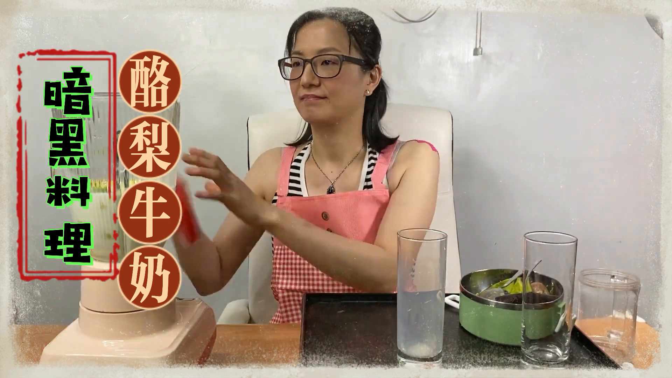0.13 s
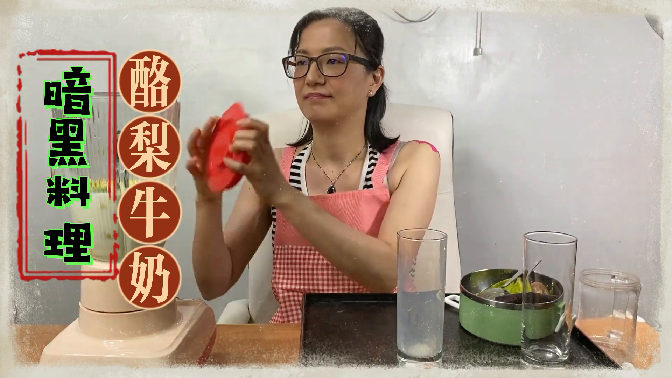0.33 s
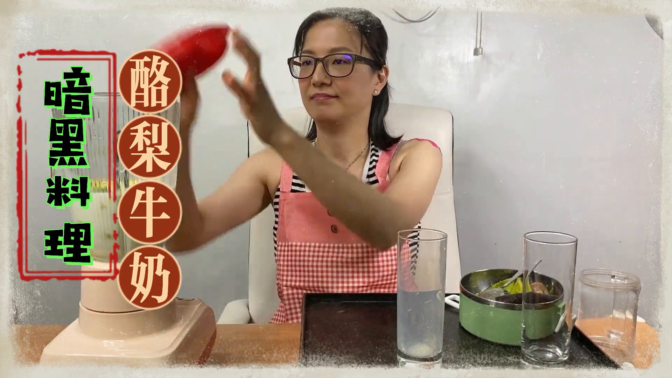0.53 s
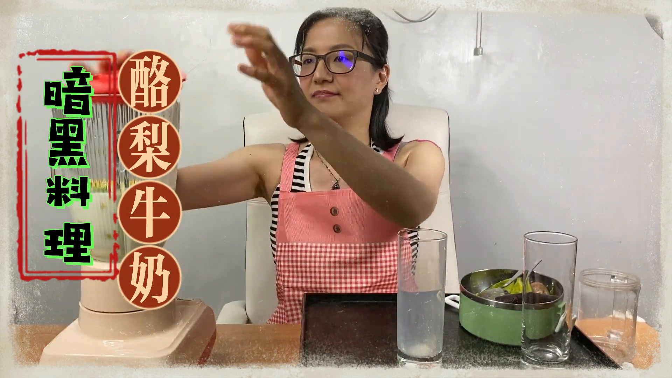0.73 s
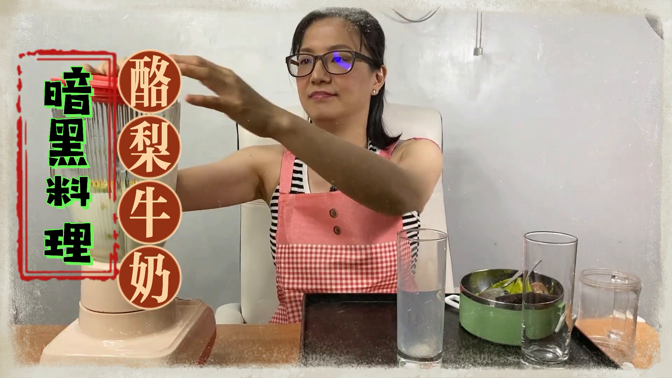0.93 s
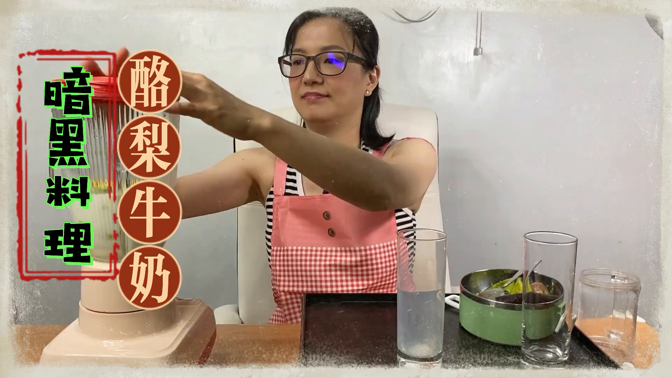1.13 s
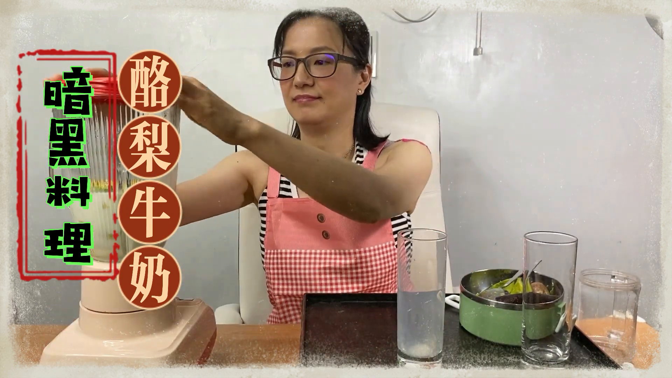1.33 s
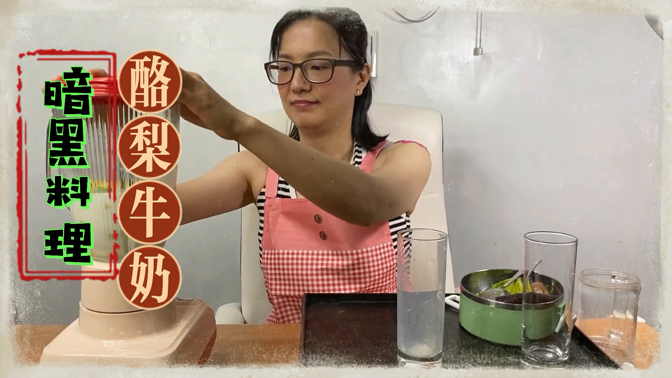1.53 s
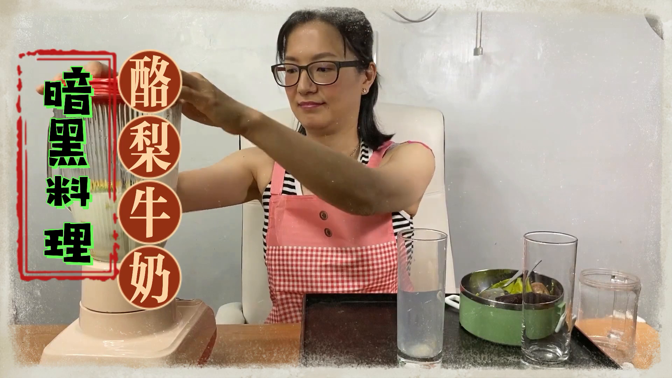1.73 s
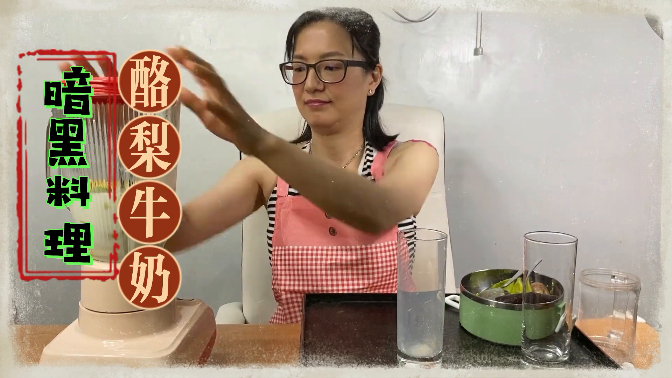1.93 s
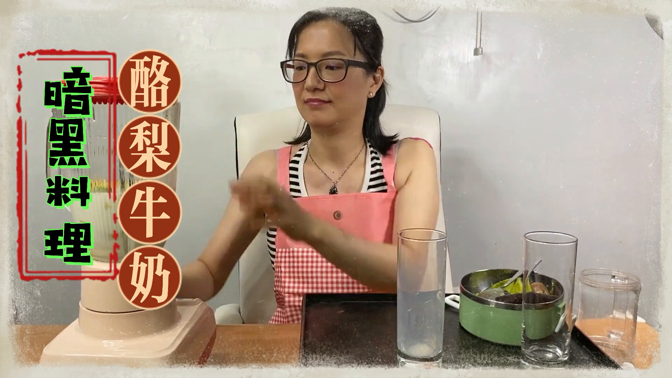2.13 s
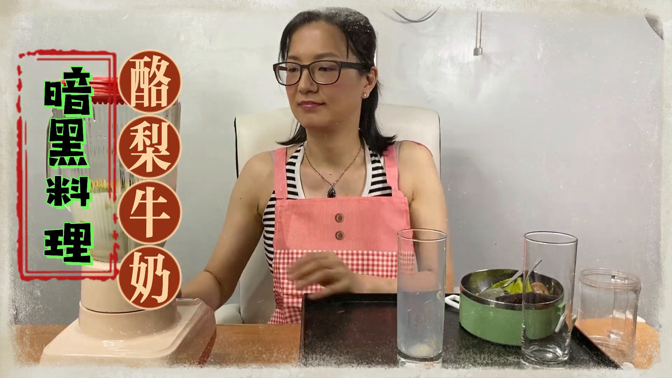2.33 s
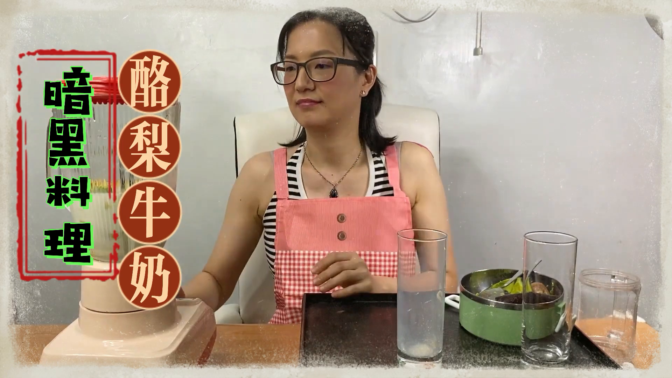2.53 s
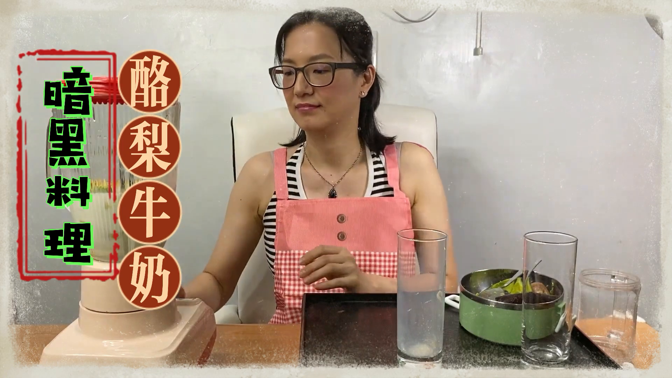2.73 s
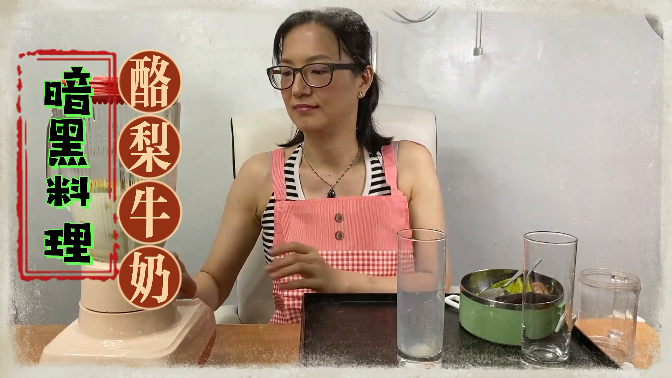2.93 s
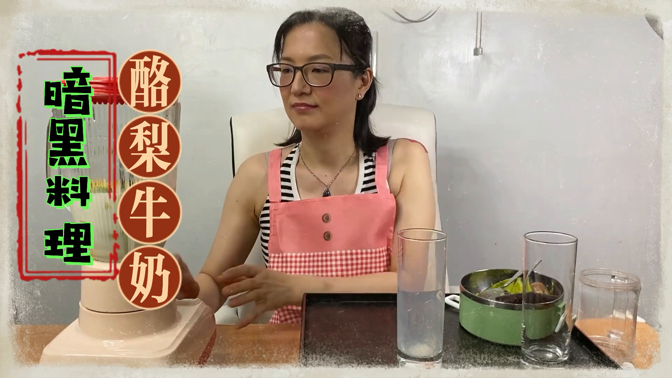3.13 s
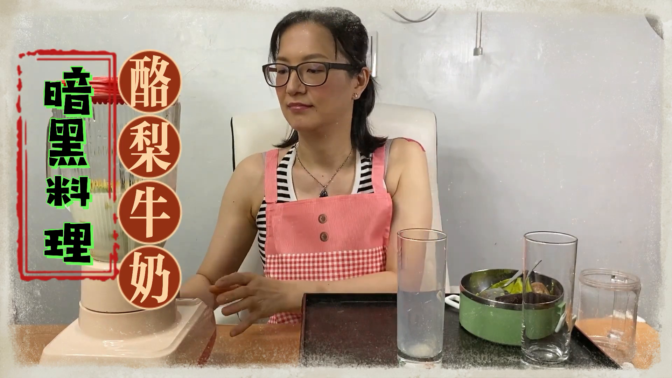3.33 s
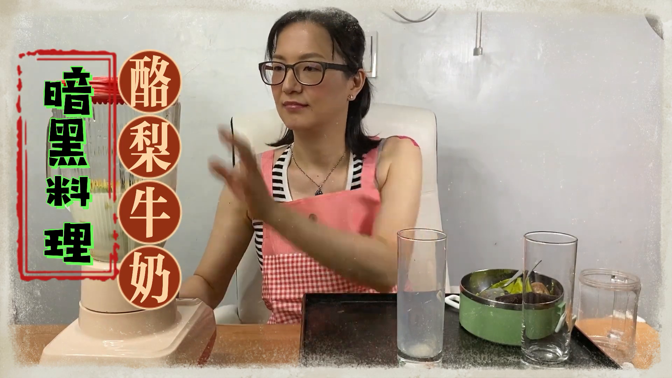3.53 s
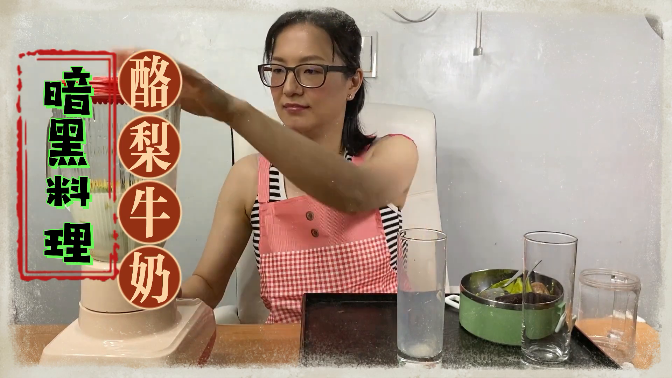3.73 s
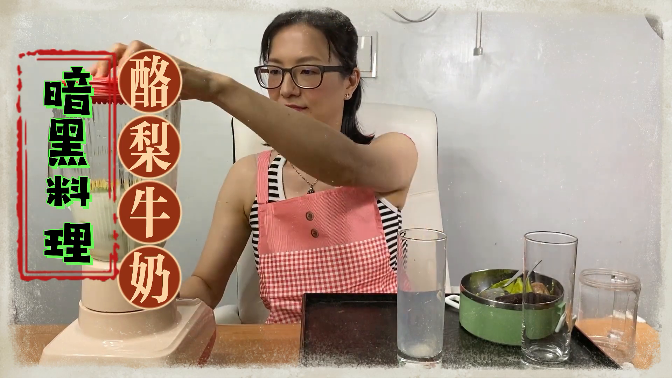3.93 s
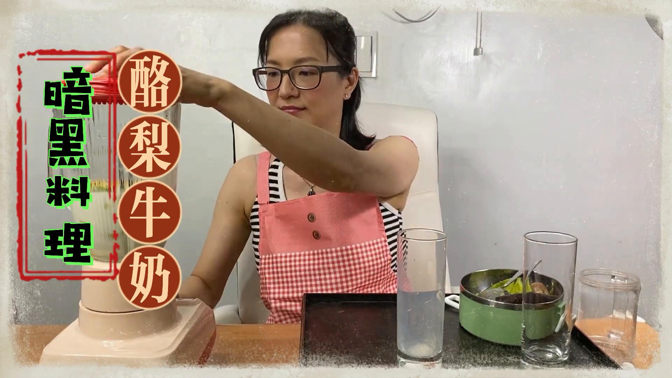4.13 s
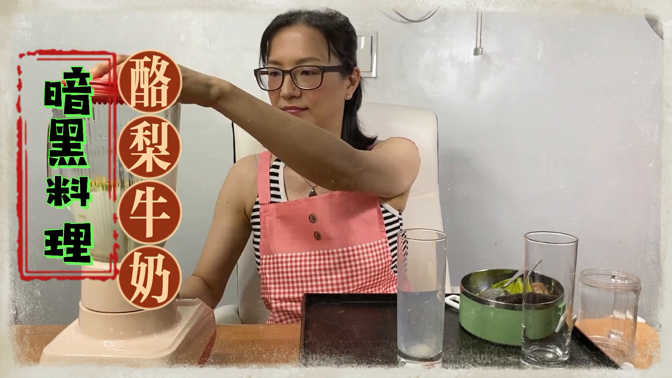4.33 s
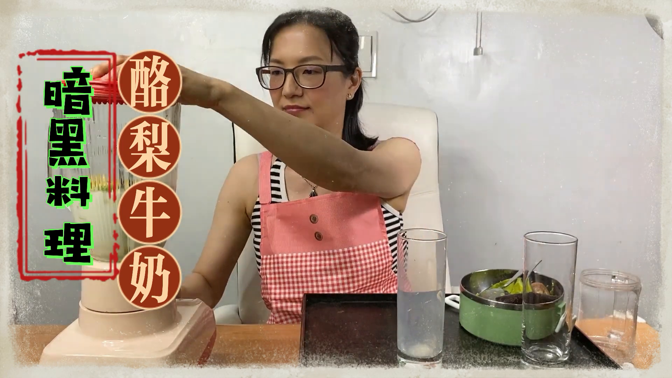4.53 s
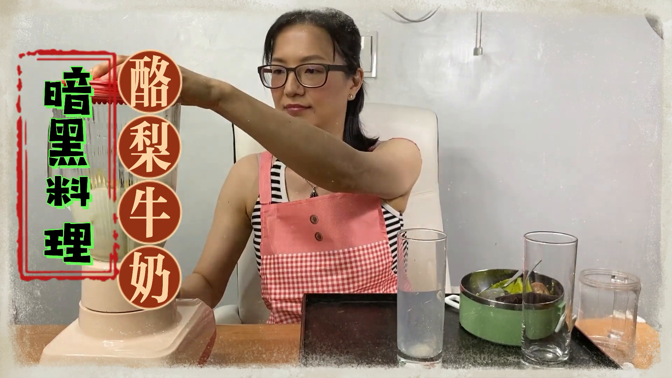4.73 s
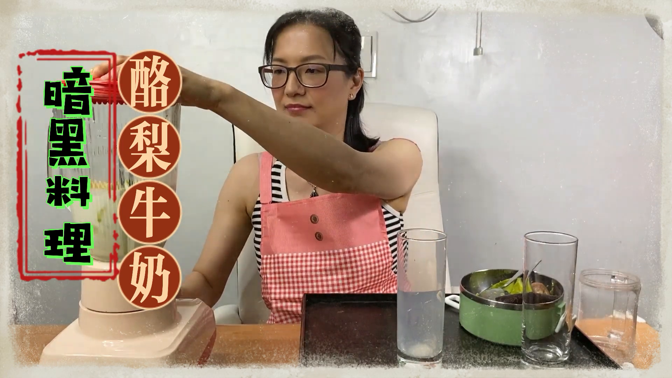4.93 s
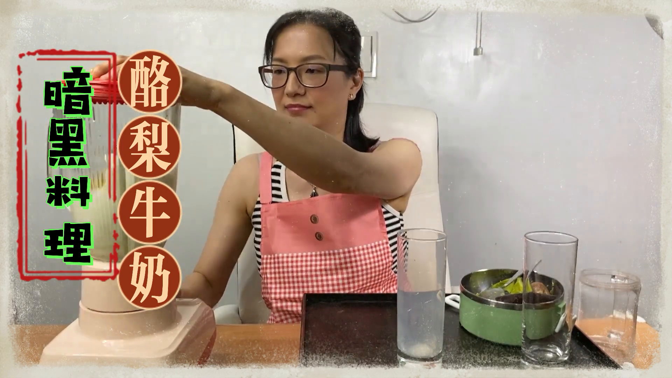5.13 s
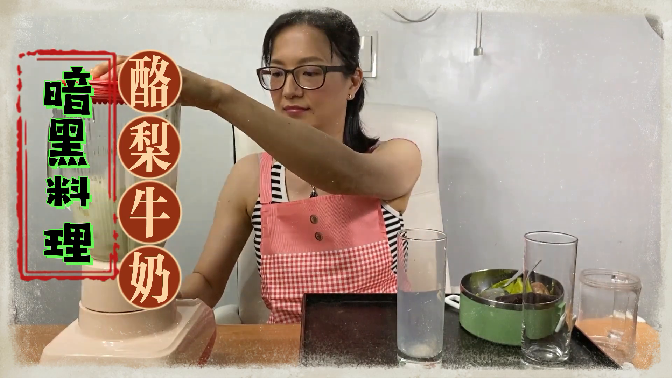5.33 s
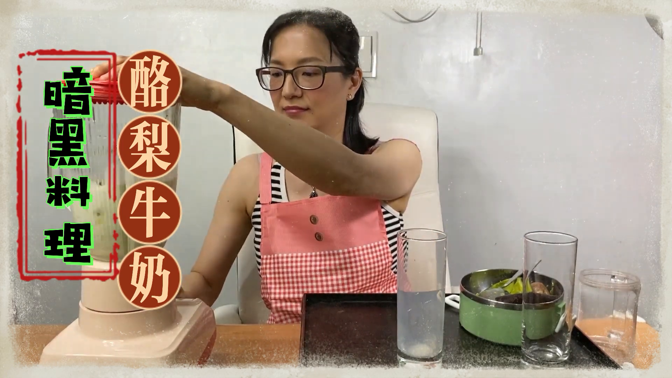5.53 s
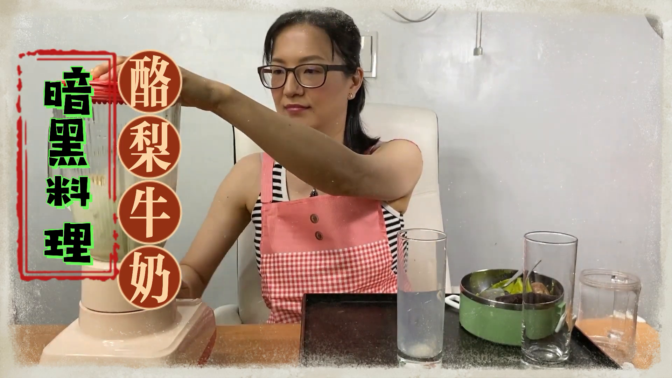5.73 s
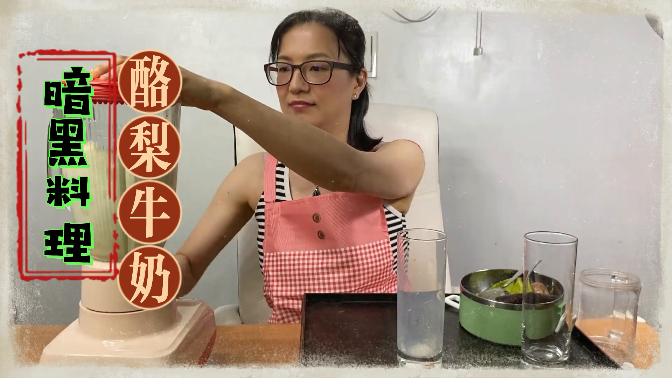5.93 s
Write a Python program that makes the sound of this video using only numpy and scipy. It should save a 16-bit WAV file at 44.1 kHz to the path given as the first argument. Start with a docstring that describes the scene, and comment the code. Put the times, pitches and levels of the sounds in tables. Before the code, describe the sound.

Close, mono sound of a blender being readied and pulsed indoors. Light plastic knocks come first, then a firm lid hit and small dull thumps and scuffs that taper away. Switch clicks begin sparsely, a strong palm thump lands, and clacks become rapid. Short wet growls, bubbling gulps and brief chirps follow, each coasting down, before a final full-speed whine and hissing splash. Low appliance hum and a short hard-room tail lie underneath.

```python
"""Blender pulsed in a kitchen

A countertop blender full of milk and fruit stands on a table in a small, hard-walled kitchen.
Its plastic lid is pushed on and worked tight: bursts of noise ring the jar, skin squeaks, air thumps.
The pulse switch is jabbed again and again: clacks and snaps ring the motor housing.
The motor twitches, churns the liquid in short bursts and at last whines up to full speed; its shaft
speed drives the whine, the shaking and the filtered noise of the liquid."""
import sys
import numpy as np
from scipy import signal
from scipy.fft import rfft, irfft
from scipy.io import wavfile
from scipy.ndimage import uniform_filter1d

SR = 44100
rng = np.random.default_rng(int(sys.argv[2]) if len(sys.argv) > 2 else 0)


def wav_out(sig):
    """Save sig, one row per channel (or a flat mono array), as 16-bit PCM at SR to the path in sys.argv[1]."""
    wavfile.write(sys.argv[1], SR, np.round(np.clip(np.atleast_2d(sig).T, -1, 1) * 32767).astype(np.int16))


N = 264600
T = np.arange(N) / SR  # time in seconds


def undb(db):
    """Turn decibels into gain."""
    return 10 ** (np.asarray(db) / 20)


def unit(x):
    """Scale to an rms of 1."""
    return x / np.sqrt(np.mean(x ** 2) + 1e-20)


def add(out, start_s, x):
    """Mix x into out from a given time."""
    i = max(int(start_s * SR), 0)
    out[i:i + len(x)] += x[:N - i]


def walk(rate_hz):
    """Random motion with a spread near 1: straight lines between random points."""
    steps = np.arange(0, 7, 1 / rate_hz)
    return 1.2 * np.interp(T, steps, rng.standard_normal(len(steps)))


def colour(x, points, size=2048):
    """Filter through (Hz, dB) points without any sound ahead of the input (minimum phase)."""
    hz, db = np.transpose(points)
    f = np.maximum(np.arange(size // 2 + 1) * SR / size, 1)
    curve_db = np.interp(np.log(f), np.log(hz), db)
    # Folding the cepstrum gathers the filter's response at its start
    cepstrum = irfft(np.log(undb(curve_db)))
    cepstrum[1:size // 2] *= 2
    cepstrum[size // 2 + 1:] = 0
    response = irfft(np.exp(rfft(cepstrum)))
    return signal.fftconvolve(x, response)[:len(x)]


def band(x, lo_hz, hi_hz, order=3):
    """Keep only the sound between two frequencies."""
    edges = [lo_hz, min(hi_hz, .45 * SR)]
    return signal.sosfilt(signal.butter(order, edges, "band", fs=SR, output="sos"), x)


def resonate(x, modes):
    """Sum of resonances, each given by Hz, width in Hz and dB."""
    out = 0
    for hz, width_hz, db in modes:
        b, a = signal.iirpeak(hz, hz / width_hz, fs=SR)
        out = out + undb(db) * signal.lfilter(b, a, x)
    return out


def registers(x):
    """Low, middle and treble parts of a sound."""
    return [band(x, 100, 700), band(x, 700, 2500), band(x, 2500, 18000)]


def contact(decay_s, evenness=0.19, size=8192):
    """Brief chatter of two plastic parts that meet; each contact favours its own frequencies."""
    fade = np.exp(-np.arange(size) / SR / max(decay_s, .001))
    chatter = rfft(rng.standard_normal(size) * fade ** 0.65)
    return irfft(chatter / np.abs(chatter) ** evenness) * fade ** 0.22


def knocks(table, spectrum, modes, attack_s, ring_db, low_db, middle_db, treble_db):
    """Each contact cracks and sets the body ringing; a harder one has more treble and less bass."""
    out = np.zeros(N)
    for start_s, strength_db, hardness_db, decay_s in table:
        push = contact(decay_s)
        push = push * (1 - np.exp(-T[:len(push)] / attack_s))
        crack = unit(colour(push, spectrum))
        ring = unit(resonate(push, modes))
        hit = crack + undb(ring_db) * ring
        trims_db = (low_db - hardness_db, middle_db, treble_db + hardness_db)
        for part, trim_db in zip(registers(hit), trims_db):
            loudest = np.sqrt(uniform_filter1d(part ** 2, size=441).max())  # over 10 ms
            add(out, start_s, undb(strength_db + trim_db) * part / loudest)
    return out


def pocket(hz, cycles, glide, rise):
    """A tone, such as a pocket of air, swells, rings for some cycles and shifts in pitch."""
    age = np.arange(int(6 * cycles / hz * SR)) * hz / SR  # in cycles, as is rise
    envelope = (1 - np.exp(-(age / rise) ** 2)) * np.exp(-age / cycles)
    tone = np.sin(2 * np.pi * age * (1 + glide * age / age[-1]))
    return envelope / envelope.max() * tone


def pockets(table, cycles, glide, rise):
    """Play rows of start in seconds, dB and starting Hz as ringing tones."""
    out = np.zeros(N)
    for start_s, db, hz in table:
        add(out, start_s, undb(db) * pocket(hz, cycles, glide, rise))
    return out


# Tone of the steady air noise. Each row: frequency in Hz, relative level in dB.
AIR_COLOUR = [(12, -43.5), (20, -1.5), (32, -5.5), (43, -8), (65, -3.5), (86, -19.5), (120, -17),
              (301, -22), (377, -21.5), (590, -25), (718, -22), (1290, -25), (1860, -23), (14700, -53.5),
              (16000, -49)]


def room_tone():
    """Steady air noise and the low, slightly wavering hum of an appliance."""
    air = colour(rng.standard_normal(N), AIR_COLOUR, size=8192)
    air *= undb(-62.5) / np.std(band(air, 91, 16000))
    hum = np.sin(2 * np.pi * np.cumsum(58.6 + 0.53 * walk(12)) / SR)
    return air + undb(-62.0 + 0.68 * walk(6)) * hum


# Lid and jar knocked or scuffed. Each row: start in seconds, strength in dB before the trims below,
# hardness in dB, decay setting of the contact in seconds.
LID_KNOCKS = [(0.028, -33, 5, 0.0052), (0.044, -37.5, 1.5, 0.012), (0.32, -43, 2, .008),
              (0.362, -46.5, 4, 0.0098), (0.38, -49.5, 8, 0.0053), (0.802, -23.5, -5, 0.0057),
              (0.81, -27.5, 5.5, 0.0089), (0.898, -38, -8.5, 0.016), (0.975, -37, 4, 0.0049),
              (0.991, -40, -8, 0.02), (1.018, -38, 7, 0.0085), (1.116, -40, -1.5, 0.0074),
              (1.167, -38, 0, 0.0057), (1.239, -42, 5.5, 0.006), (1.258, -51, -5, .006),
              (1.352, -53.5, -11.5, 0.01), (1.5, -51.5, -7, .007), (1.548, -43.5, -2.5, 0.0067),
              (1.607, -43, -8.5, 0.0052), (1.715, -48, -8, 0.0098), (1.768, -42, 1.5, 0.0065),
              (1.789, -40.5, 3.5, 0.0039), (1.855, -43.5, -4, 0.011), (1.961, -52.5, 6.5, .009),
              (2.255, -52, -12, 0.0053), (2.309, -46.5, -2.5, .009), (3.875, -30, 2.5, .006),
              (3.891, -28.5, 0.5, 0.0046), (3.999, -38, -2, .005)]
# Tone of the crack. Each row: frequency in Hz, relative level in dB.
LID_COLOUR = [(88, -48.5), (150, -9), (248, -6.5), (339, -11), (561, -5), (695, -13), (1420, -11),
              (2500, -20.5), (4140, -19), (6860, -32.5), (15500, -54)]
# Ringing of the jar with its lid. Each row: frequency in Hz, relative level in dB,
# time to fade by 60 dB in seconds.
JAR = [(261, 15, 0.6), (597, 16, 0.078), (1254, 14, 0.076), (1380, 10, 0.66), (1730, 6, 0.051),
       (1970, 1, 0.2), (2180, -15, 0.079), (2940, -39, 0.43), (3520, 1, 0.48), (3830, -15, 0.43),
       (4730, 4, 0.49), (4900, -45, 0.19)]


def lid():
    """Plastic knocks and scuffs crack and ring the jar; long rings are narrow resonances."""
    modes = [(hz, np.log(1000) / np.pi / t60_s, db) for hz, db, t60_s in JAR]
    return knocks(LID_KNOCKS, LID_COLOUR, modes, attack_s=0.000093, ring_db=-18.0,
                  low_db=-13.5, middle_db=-7.5, treble_db=-17.0)


# Fingers squeaking on the lid. Each row: middle in seconds, average level in dB, average pitch in Hz.
SQUEAKS = [(0.376, -56, 3850), (0.565, -62, 3650)]


def squeaks(length_s, spread):
    """Skin sticks and slips on plastic: a short, unsteady, narrow chirp."""
    out = np.zeros(N)
    for middle_s, db, hz in SQUEAKS:
        slips = np.sin(2 * np.pi * np.cumsum(hz * (1 + spread * walk(980))) / SR)
        swell = np.exp(-((T - middle_s) / length_s) ** 2)
        out += undb(db + 2 * walk(198.6)) * swell * slips
    return out


# Palm on the lid. Each row: start in seconds, peak level in dB, starting pitch in Hz.
THUMPS = [(0.806, -34, 267), (0.985, -35, 375), (1.018, -37.5, 219), (1.125, -46, 230), (1.165, -41.5, 198),
          (1.238, -35, 223), (1.352, -38, 200), (3.879, -20.5, 239)]


def thumps():
    """The palm bounces the air in the jar: a dull, quickly fading tone that sinks slightly."""
    return pockets(THUMPS, cycles=1.37, glide=-0.03, rise=0.65)


# Switch pushed in. Each row: start in seconds, strength in dB before the trims below,
# hardness in dB, time until it bottoms out in seconds.
PUSHES = [(2.662, -45, -12, 0.0064), (2.842, -31, -0.5, 0.025), (3.683, -38.5, -4.5, .008),
          (4.048, -29, 0, .013), (4.137, -42, -2, 0.0065), (4.161, -37.5, -1, 0.0061),
          (4.23, -32, -0.5, .008), (4.268, -31.5, -5, .012), (4.422, -28, -0.5, 0.011),
          (4.558, -29.5, 1, 0.013), (4.76, -31, 3.5, 0.018), (4.84, -39.5, -7, .006),
          (4.904, -25.5, 1.5, .014), (5.103, -29.5, 1, .014), (5.273, -31.5, 4.5, .01)]
# Switch springing back. Each row: start in seconds, strength in dB before the trims below, hardness in dB.
SNAPS = [(2.713, -48, -1), (2.916, -25.5, -0.5), (3.214, -35.5, 2.5), (3.754, -29.5, -0.5),
         (3.949, -27, -2.5), (4.147, -32, 1), (4.316, -27, 3.5), (4.502, -28.5, -0.5), (4.657, -25, 1.5),
         (4.851, -28.5, 2), (5.033, -31.5, 3.5), (5.212, -28, 1.5), (5.375, -32, 4), (5.72, -37.5, 4.5),
         (5.791, -26.5, 1.5)]
# Tone of the push. Each row: frequency in Hz, relative level in dB.
PUSH_COLOUR = [(88, -68), (150, -4), (376, -31.5), (524, 4), (790, -14), (1390, -1), (1870, -9.5),
               (2550, -3), (5460, -14), (6390, -18.5), (8560, -11.5), (14000, -39), (16000, -36)]
# Tone of the snap. Each row: frequency in Hz, relative level in dB.
SNAP_COLOUR = [(120, -32), (200, -19), (506, 0), (702, -16.5), (1130, -18), (1380, -3), (2090, -3.5),
               (2700, 3), (3070, -6), (3610, -2), (15500, -49.5)]
# Resonances of the motor housing, which carries the switch; the blending noise rings it too.
# Each row: frequency in Hz, width in Hz, relative level in dB.
HOUSING = [(234, 46, 0), (367, 17, 9), (532.8, 8.7, 14), (990, 70, -10.5), (1156, 210, 2.5),
           (1366, 105, 9.5), (1625, 71, 5.5), (2080, 170, -2.5), (2550, 110, -8), (2730, 110, 1),
           (3426, 360, 6.5), (3920, 120, -2), (4020, 64, 2), (6150, 170, -2.5), (8180, 110, -8.5)]


def switch(bottom_db=-2.0, push_decay_s=0.0092, snap_decay_s=0.0043):
    """The sprung switch clacks in, bottoms out and snaps back, ringing the motor housing."""
    pushes = []
    for start_s, db, hardness_db, lag_s in PUSHES:
        pushes.append((start_s, db, hardness_db, push_decay_s))
        pushes.append((start_s + lag_s, db + bottom_db, hardness_db, push_decay_s))
    snaps = [(start_s, db, hardness_db, snap_decay_s) for start_s, db, hardness_db in SNAPS]
    clacks = knocks(pushes, PUSH_COLOUR, HOUSING, attack_s=0.00057, ring_db=-2.5,
                    low_db=-16.5, middle_db=-5, treble_db=-15)
    returns = knocks(snaps, SNAP_COLOUR, HOUSING, attack_s=0.00026, ring_db=-4.5,
                     low_db=-18.0, middle_db=-7.5, treble_db=-5.0)
    return clacks + returns


# Power reaches the motor. Each row: start in seconds, time held in seconds, coasting decay in seconds,
# then churn, rattle, spray and whine levels in dB before the trims and changes with speed below.
JABS = [(4.257, 0.033, 0.049, -27, -31.5, -41, -55), (4.564, .08, 0.087, -29, -32, -43.5, -46),
        (4.914, .07, .24, -26.5, -27.5, -42.5, -38), (5.112, .075, .14, -30, -29.5, -45, -47),
        (5.278, 0.033, 0.53, -31, -29.5, -44.5, -43), (5.471, 0.05, .28, -28, -28.5, -45.5, -30),
        (5.765, 0.31, .3, -28, -27, -42, -29.5)]
TOP_TURNS_HZ, SPIN_UP_S = 121, .05  # free speed in turns per second; time constant of the run-up


def shaft():
    """Under power the shaft runs up towards its free speed, then coasts; torque falls as speed rises."""
    speed, torque = np.zeros(N), np.zeros(N)
    for start_s, held_s, coast_s, *_ in JABS:
        i = int(start_s * SR)
        age = T[i:] - T[i]
        powered_s = np.minimum(age, held_s)
        coasting_s = np.maximum(age - held_s, 0)
        # Slip is how far the shaft lags its free speed, from 1 at rest to 0
        slip = (1 - speed[i] / TOP_TURNS_HZ) * np.exp(-powered_s / SPIN_UP_S)
        speed[i:] = TOP_TURNS_HZ * (1 - slip) * np.exp(-coasting_s / coast_s)
        torque[i:] = slip * (age < held_s)
    return speed, uniform_filter1d(torque, size=441)


def jab_levels():
    """Churn, rattle, spray and whine levels of each jab, held until the next."""
    table = np.array(JABS)
    latest = np.maximum(np.searchsorted(table[:, 0], T) - 1, 0)
    return uniform_filter1d(table[latest, 3:], size=882, axis=0).T  # 20 ms blend


# Tone of the blending noise. Each row: frequency in Hz, relative level in dB.
BLEND_COLOUR = [(40, -19.5), (115, -9.5), (229, -4.5), (300, -12), (500, -6), (680, -12), (920, -4),
                (1900, -19.5), (2550, -11), (3100, -15.5), (4400, -17), (5400, -22.5), (10000, -37),
                (15500, -59)]


def blending(turns, churn_db, rattle_db, spray_db):
    """Blades fling drops and pulp at the jar, harder twice a turn; the housing resonates, bubbles ring."""
    sweep = 1 + 0.097 * np.cos(2 * np.pi * 2 * turns)
    landings = rng.random(N) < 3000 / SR  # about 3000 a second
    extra_db = 1.3 * np.minimum(rng.exponential(size=N), 3)
    drops = landings * rng.standard_normal(N) * undb(extra_db)
    pulp = 0.5 * rng.standard_normal(N)
    impacts = (unit(drops) + pulp) * sweep * undb(0.45 * walk(120))
    wash = unit(colour(impacts, BLEND_COLOUR)) + undb(-3.5) * unit(resonate(impacts, HOUSING))
    # Random start, level spread over 12 dB and pitch from 170 to about 648 Hz
    rows = [(T[-1] * a, 12 * b, 170 * 3.81 ** c) for a, b, c in rng.random((500, 3))]
    bubbles = pockets(rows, cycles=6.6, glide=0.16, rise=0.54)
    low, middle, treble = map(unit, registers(wash))
    churn = unit(low + undb(-8.5) * unit(bubbles))
    spray = treble * undb(1.2 * walk(140))  # fine spray comes in spurts
    return undb(churn_db - 4.5) * churn + undb(rattle_db - 1.5) * middle + undb(spray_db + 2) * spray


def liquid(speed, torque, turns, churn_db, rattle_db, spray_db):
    """Blending grows louder with speed, and with torque as the blades bite into still liquid."""
    octaves = np.log2(speed / TOP_TURNS_HZ + 1e-6)  # doublings of speed, 0 at free speed
    bite_db = 5 * torque
    return blending(turns, churn_db + bite_db + 6.5 * octaves,
                    rattle_db + bite_db + 9 * octaves,
                    spray_db + bite_db + 8.5 * octaves)


# Motor frame that radiates the whine, passed through twice.
# Each row: frequency in Hz, width in Hz, level in dB for each pass.
WHINE_BODY = [(2440, 720, -1)]


def commutator_whine(turns, whine_db):
    """Commutator bars pass the brushes 24 times a turn; the motor frame rings with the whine."""
    bars = np.sin(2 * np.pi * 24 * turns)
    body = resonate(resonate(bars, WHINE_BODY), WHINE_BODY)
    pressure = 0.81 + 0.41 * np.cos(2 * np.pi * turns)  # the brushes press unevenly round the turn
    return undb(whine_db + 2 * walk(200)) * body * pressure


# Shaft unbalance. Each row: multiple of the shaft rate, average level in dB before the trim below.
UNBALANCE = [(1, -30.5), (2, -25.5), (3, -30.5), (4, -38), (6, -36), (8, -38.5), (9, -38.5), (12, -39)]


def unbalance_shake(speed, turns):
    """The uneven shaft shakes at multiples of its rate, fading steeply below 113 turns a second."""
    shake = np.zeros(N)
    for multiple, db in UNBALANCE:
        shake += undb(db + 2.7 * walk(30)) * np.sin(2 * np.pi * round(multiple) * turns)
    return shake * undb(1.2 * np.minimum(speed - 113, 0) - 1.5)


def motor_hum(speed):
    """A 60 Hz mains hum with low rumble fades in between 30 and 78 turns a second."""
    rumble = unit(band(rng.standard_normal(N), 20, 116))
    hum = np.sin(2 * np.pi * 60 * T) + 0.69 * rumble
    return undb(-45.0) * np.clip((speed - 30) / 48, 0, 1) * hum


def motor():
    """One turning shaft drives the whine, the shaking, the hum and the churned liquid."""
    speed, torque = shaft()
    churn_db, rattle_db, spray_db, whine_db = jab_levels()
    turns = np.cumsum(speed * (1 + 0.0098 * walk(300))) / SR  # lumps of fruit jolt the shaft
    return (commutator_whine(turns, whine_db) + unbalance_shake(speed, turns) + motor_hum(speed)
            + liquid(speed, torque, turns, churn_db, rattle_db, spray_db))


# Air pockets gulped by the blades. Each row: start in seconds, peak level in dB, starting pitch in Hz.
GULPS = [(4.295, -33.5, 482), (4.640, -38, 358), (4.705, -40.5, 492), (4.984, -26, 500),
         (5.008, -29.5, 350), (5.180, -25, 483), (5.190, -27.5, 226), (5.493, -37, 497), (5.664, -30, 478)]


def gulps():
    """Gulped air swells, rings and rises in pitch."""
    return pockets(GULPS, cycles=4.9, glide=0.17, rise=2.4)


# Motor housing chirping as the switch is pushed in.
# Each row: start in seconds, peak level in dB before its flutter, starting pitch in Hz.
CHIRPS = [(5.11, -25, 1298), (5.272, -26, 1243)]


def chirps():
    """The housing chirps: a swelling, fluttering tone that rises in pitch."""
    return pockets(CHIRPS, cycles=9, glide=.3, rise=14.6) * undb(2.6 * walk(400))


def splash(middle_s=5.91, length_s=0.045, level_db=-43.5):
    """Liquid climbs the jar as the blades near full speed and breaks into hissing spray."""
    hiss = unit(band(rng.standard_normal(N), 3500, 15000, order=1))
    swell = np.exp(-((T - middle_s) / length_s) ** 2)
    return undb(level_db + 2 * walk(200)) * swell * hiss


def kitchen(x, t60_low, t60_middle, t60_treble, size=22050):
    """The short tail that close, hard walls send back; each t60 is seconds to fade by 60 dB."""
    t = np.arange(size) / SR
    parts = registers(rng.standard_normal(size))
    tail = sum(part * undb(-60 * t / t60) for part, t60 in zip(parts, (t60_low, t60_middle, t60_treble)))
    tail *= np.clip((t - .002) / 0.0041, 0, 1)  # silent for 2 ms, then fades in
    return signal.fftconvolve(x, tail / np.linalg.norm(tail))[:N]


def scene():
    """Lid, switch and motor sound in the same room; the lid, held high, sends more to the walls."""
    lid_sounds = lid() + squeaks(length_s=0.018, spread=0.081)
    palm = thumps()
    machine = switch() + motor() + gulps() + chirps() + splash()
    to_walls = undb(-9) * machine + undb(-4.5) * lid_sounds + undb(-8.5) * palm
    echo = kitchen(to_walls, t60_low=0.27, t60_middle=0.27, t60_treble=0.25)
    return (machine + lid_sounds + palm + echo + room_tone())[None]


def record(dry):
    """Cut the top of the treble steeply, above 15800 Hz."""
    return signal.sosfilt(signal.ellip(8, .2, 70, 15800, fs=SR, output="sos"), dry)


dry = scene()
out = record(dry)
wav_out(out)
```